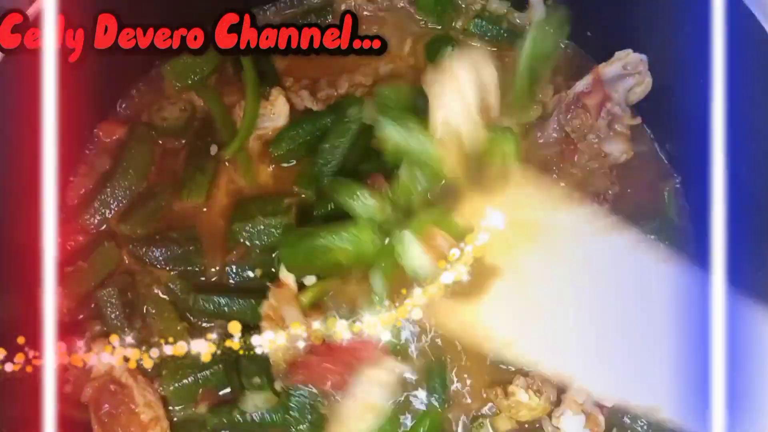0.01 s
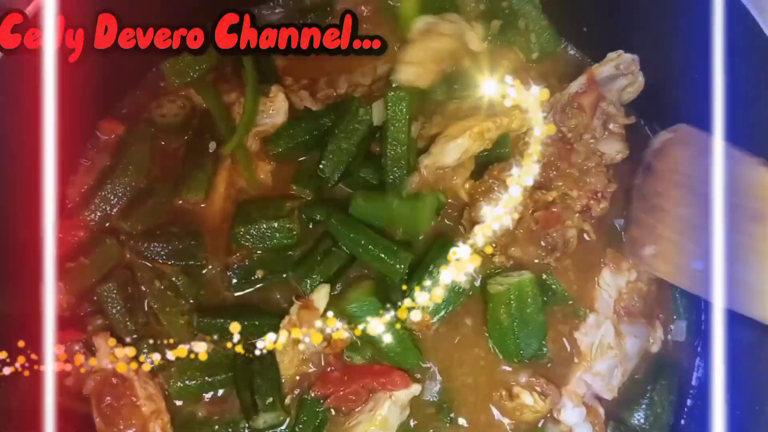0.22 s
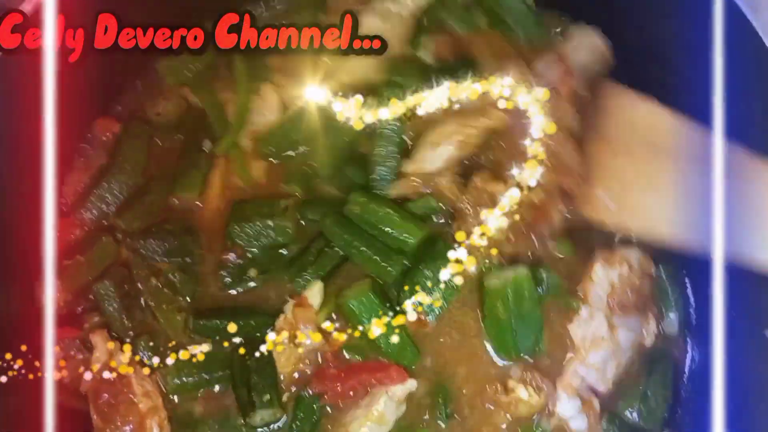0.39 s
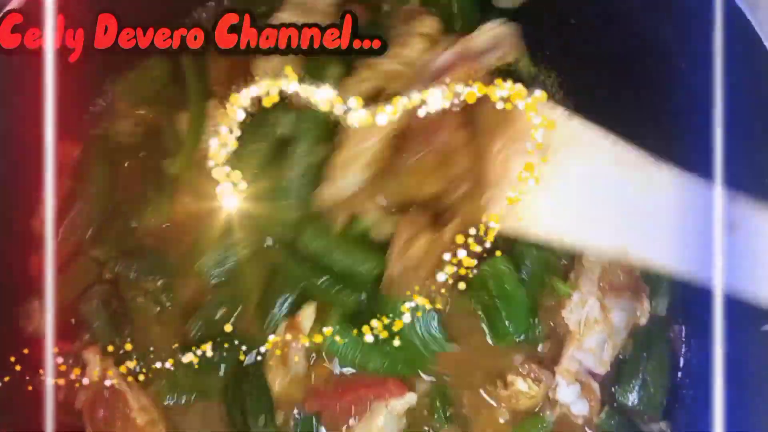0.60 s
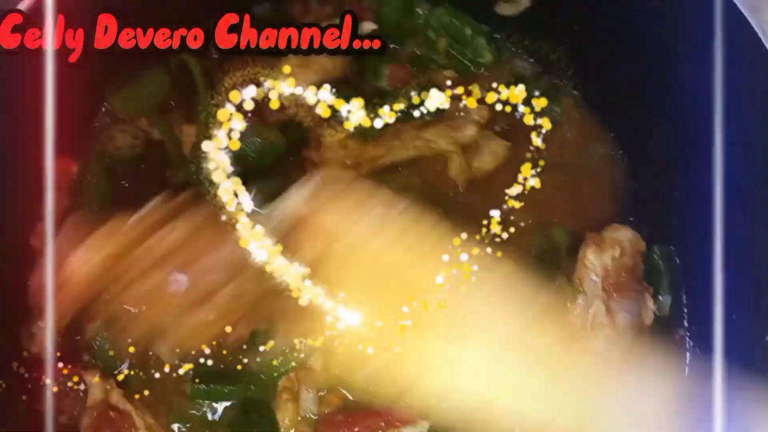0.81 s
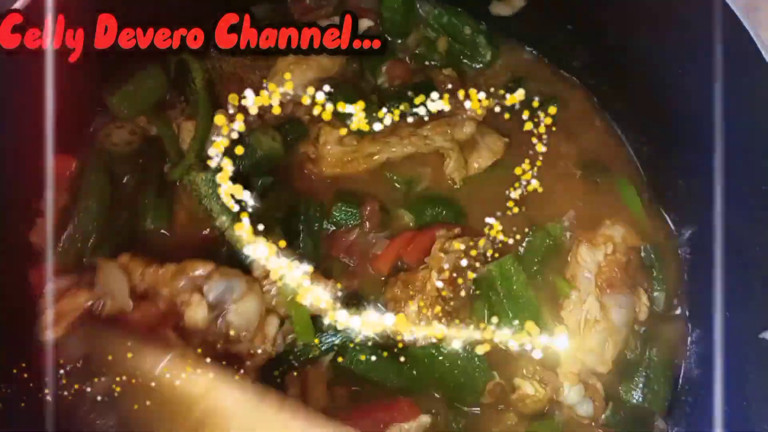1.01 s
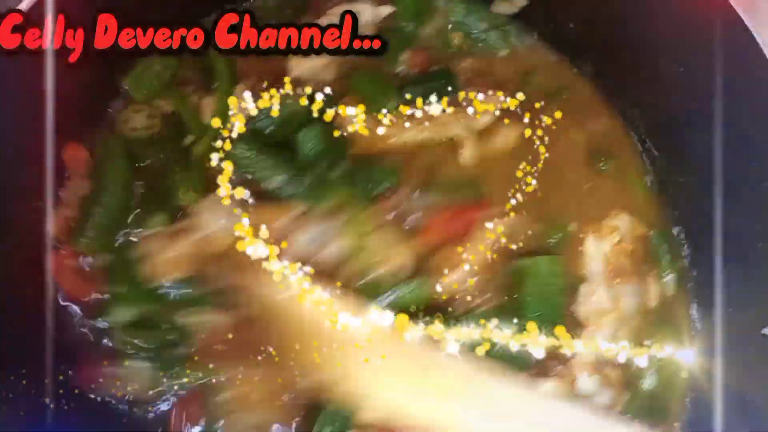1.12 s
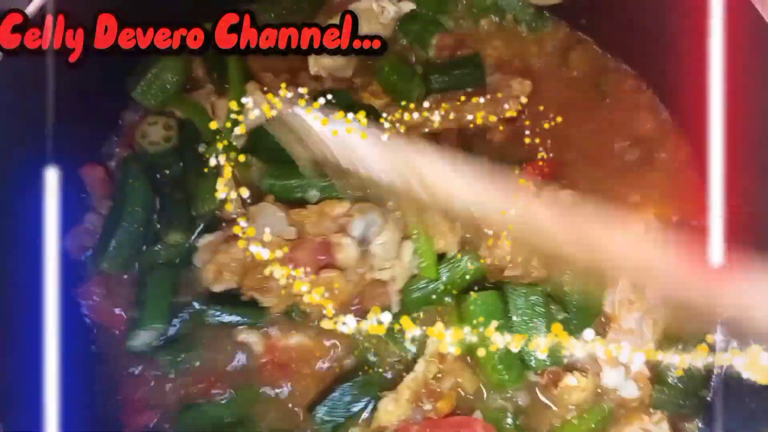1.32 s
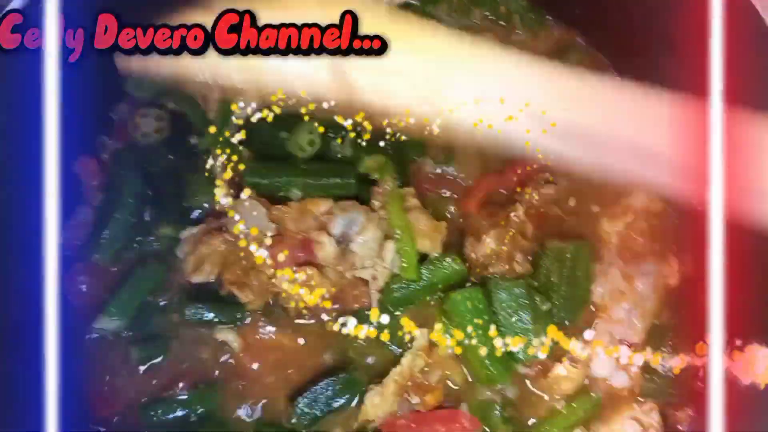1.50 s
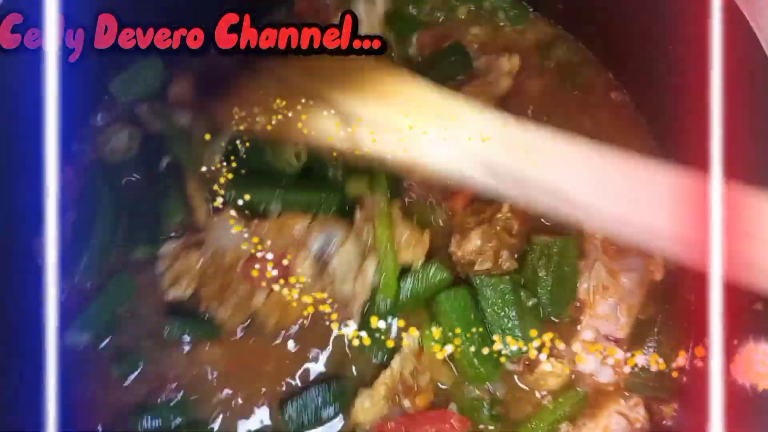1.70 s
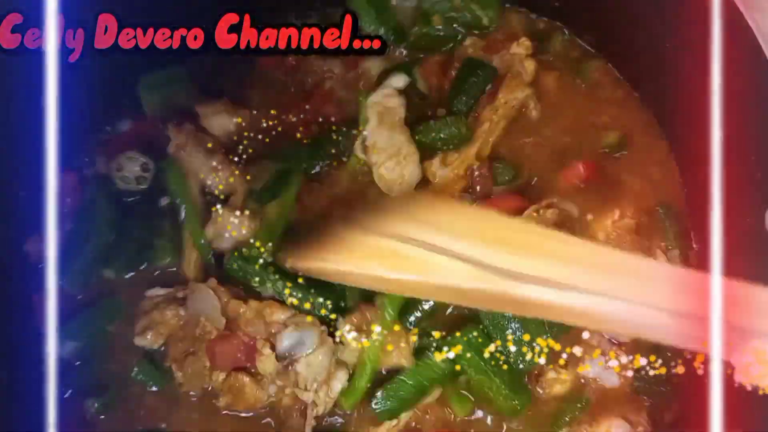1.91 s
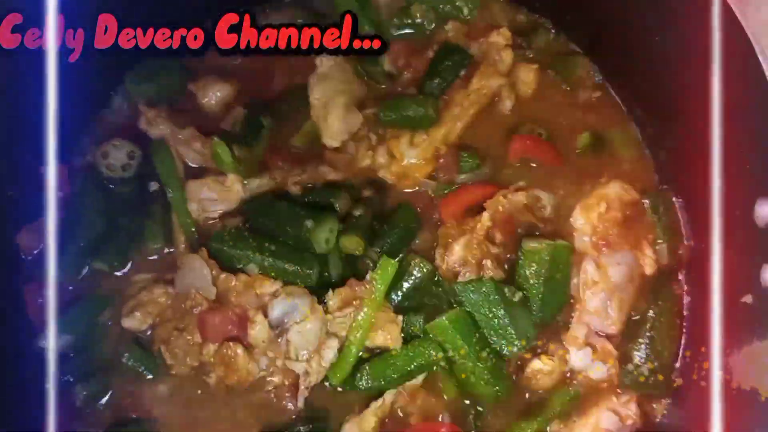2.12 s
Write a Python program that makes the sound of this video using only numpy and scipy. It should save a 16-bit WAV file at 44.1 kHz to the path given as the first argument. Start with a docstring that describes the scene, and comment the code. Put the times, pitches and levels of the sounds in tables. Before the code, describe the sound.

A wooden spatula ticks and knocks hard on a pot wall early on, then lands with a dull wet plop; faint bubbles, squelches and simmering hiss follow, close up in a small kitchen, mono.

```python
"""A small kitchen, at a pot of thick stew: a wooden spatula ticks, then knocks on the pot wall.
It lands once more with a dull, wet plop. Knocks and plop are damped ringing tones; the knocks add noise cracks.
Bubbles are short rising rings and squelches are swells of crackle, over a faint hiss of shaped noise.
A low hum of wavering tone and rumble swells and fades underneath.
The room answers spatula, bubbles and squelches with decaying noise; hiss and hum stay dry."""
import sys
import numpy as np
from scipy import signal
from scipy.fft import rfft, irfft, next_fast_len
from scipy.io import wavfile
from scipy.ndimage import map_coordinates

SR = 44100
rng = np.random.default_rng(int(sys.argv[2]) if len(sys.argv) > 2 else 0)


def materialize(psi):
    """Save the field psi as 16-bit PCM at rate SR to the path in sys.argv[1].

    A 1-D psi becomes a single channel; in a 2-D psi each row is a channel.
    """
    bounded = np.clip(np.atleast_2d(psi).T, -1, 1)
    quanta = np.round(bounded * 32767).astype(np.int16)
    wavfile.write(sys.argv[1], SR, quanta)


N = 97020  # 2.2 s


def amp(db):
    """Decibels to gain."""
    return 10 ** (np.asarray(db) / 20)


def unit(x):
    """Scale to rms 1."""
    return x / np.sqrt(np.mean(x ** 2) + 1e-20)


def along(points, hz):
    """Read (Hz, value) points on a log frequency axis."""
    f, v = np.transpose(points)
    return np.interp(np.log(hz + 1), np.log(f + 1), v)


def curve(rows):
    """Join (s, value) points by straight lines, one value per sample."""
    return np.interp(np.arange(N) / SR, *np.transpose(rows))


def wobble(rate):
    """A smooth random curve with rate knots a second."""
    return map_coordinates(rng.standard_normal(400), [np.arange(N) * rate / SR], mode="wrap")


def filtered(x, response):
    """Shape the spectrum of x by a response of frequency."""
    m = next_fast_len(len(x) + SR // 10)
    spectrum = rfft(x, m) * response(np.fft.rfftfreq(m, 1 / SR))
    return irfft(spectrum, m)[:len(x)]


def low_cut(x, hz):
    """Remove the bass below hz."""
    return signal.sosfilt(signal.butter(2, hz, "high", fs=SR, output="sos"), x)


def noise(response):
    """Noise of rms 1 with the given colour."""
    return unit(filtered(rng.standard_normal(N), response))


def fade(t, t60):
    """Exponential decay, 60 dB in t60 seconds."""
    return np.exp(-np.log(1000) * t / t60)


def ring(modes, t, attack):
    """Damped modes struck together, with a soft onset of attack seconds."""
    tones = sum(amp(db) * fade(t, t60) * np.sin(2 * np.pi * hz * t) for hz, db, t60 in modes)
    return tones * (1 - np.exp(-t / attack))


def add(track, s, sound):
    """Mix a sound into the track at time s."""
    part = track[max(0, round(s * SR)):][:len(sound)]
    part += sound[:len(part)]


# Spatula contacts on the pot wall: t/s, then relative strength level/dB at each FORCE_BANDS frequency
CONTACTS = [(0.2034, -41.5, -6.5, -27.5, 2), (0.2837, 2.5, -17.5, -24, -10), (.2866, -7.5, 4.5, 2.5, -7.5),
            (0.2881, -12, -27, -12, 0), (0.2904, -27, -17, -13, -14)]
# Frequencies at which each contact's strength is given: f/Hz
FORCE_BANDS = [700, 2100, 3800, 6200]
# Modes of the pot wall: f/Hz, relative level/dB, t60/s
POT_MODES = [(322, -46, .15), (393, -30, .042), (497, -41, .17), (736, -23.5, .03), (1079, -33.5, .04),
             (1635, -20.5, .0053), (2005, -26, .027), (2240, -17.5, .014), (2450, -21, .0094),
             (2775, -27, .025), (3055, -36, .028), (4470, -24, .018), (5050, -34, .013),
             (5590, -25.5, .014), (6200, -31, .012)]
# Colour of the dry crack of a contact: f/Hz, relative level/dB
CRACK_COLOUR = [(150, -30), (500, -11), (900, 14.5), (1500, -34.5), (2600, -1.5), (3700, 0), (5000, 11),
                (6500, -11.5), (7700, -4.5), (8800, -31), (10000, -39), (15000, -28)]
KNOCK_DB, KNOCK_ATTACK_S = -0.5, 0.00013
CRACK_DB, CRACK_T60_S = -32, 0.026
POT_LOW_CUT_HZ, WOOD_HIGH_CUT_HZ = 194, 8100


def knocks():
    """Each contact rings the pot wall and cracks; its force spectrum colours both."""
    wall, cracks = np.zeros(N), np.zeros(N)
    t = np.arange(SR // 4) / SR
    for s, *strengths in CONTACTS:
        force = list(zip(FORCE_BANDS, strengths))
        struck = [(hz, db + along(force, hz), t60) for hz, db, t60 in POT_MODES]
        add(wall, s, ring(struck, t, KNOCK_ATTACK_S))
        crack = noise(lambda f: amp(along(CRACK_COLOUR, f)))
        crack = filtered(crack, lambda f: amp(along(force, f)))[:len(t)]
        add(cracks, s, crack * fade(t, CRACK_T60_S))
    return amp(KNOCK_DB) * damped(wall), amp(CRACK_DB) * low_cut(cracks, POT_LOW_CUT_HZ)


def damped(wall):
    """The small pot gives out little deep bass, and wood excites little top treble."""
    high_cut = signal.butter(6, WOOD_HIGH_CUT_HZ, fs=SR, output="sos")
    return signal.sosfilt(high_cut, low_cut(wall, POT_LOW_CUT_HZ))


# What rings as the spatula lands in the stew: f/Hz, relative level/dB, t60/s
PLOP_MODES = [(717, -1.5, 0.021), (857, -5, 0.011), (1004, -15, .011), (1870, -14.5, 0.019),
              (2310, -19.5, 0.026)]
PLOP_S, PLOP_DB, PLOP_ATTACK_S, PLOP_LOW_CUT_HZ = 0.6647, -24.5, 0.00048, 585


def plop():
    """A soft blow cushioned by the stew: damped modes with a slower attack than the knocks."""
    out = np.zeros(N)
    t = np.arange(SR // 10) / SR
    add(out, PLOP_S, amp(PLOP_DB) * ring(PLOP_MODES, t, PLOP_ATTACK_S))
    return low_cut(out, PLOP_LOW_CUT_HZ)


# Wet food shifting and tearing off the spatula:
# t/s at the peak, Gaussian spread/s, peak level/dB, centre f/Hz, Gaussian width/octaves
WET_SWELLS = [(0.219, 0.0026, -52, 6300, .5), (0.691, 0.035, -67, 4570, 0.38),
              (1.009, 0.011, -65, 4240, .4), (1.222, 0.0048, -58.5, 3400, 0.3),
              (1.34, 0.0094, -66.5, 3380, 0.87), (1.641, .02, -67.5, 346, 0.17),
              (1.7476, 0.0019, -50, 4800, 0.22), (1.751, 0.0092, -55, 1390, 1.9),
              (1.937, 0.021, -68, 418, 0.53), (2.125, 0.0046, -59.5, 5050, 0.51),
              (0.539, 0.01, -69.5, 5630, .4), (0.53, 0.019, -67.5, 210, 0.23),
              (.935, .015, -77.5, 6950, 0.27)]
GRAINS_PER_S, SMOOTH_NOISE = 600, 0.3  # smooth noise is relative to the grains' rms


def squelches():
    """Short swells of wet crackle: many tiny films of sauce breaking."""
    out, t = np.zeros(N), np.arange(N) / SR
    for s, spread, db, hz, octaves in WET_SWELLS:
        breaks = rng.random(N) < GRAINS_PER_S / SR
        grains = unit(rng.choice([-1, 1], N) * breaks)
        crackle = grains + SMOOTH_NOISE * rng.standard_normal(N)

        def band(f):
            return np.exp(-.5 * (np.log2((f + 1) / hz) / octaves) ** 2) / (1 + (f / 7800) ** 20)

        swell = np.exp(-.5 * ((t - s) / spread) ** 2)
        out += amp(db) * swell * unit(filtered(crackle, band))
    return out


POP_RISE = 0.04  # fraction of the pitch gained over one t60


def bubble(hz, t60):
    """A short ring whose pitch rises as it dies."""
    t = np.arange(SR // 20) / SR
    cycles = hz * t * (1 + POP_RISE * np.minimum(t / t60, 1) / 2)
    return fade(t, t60) * np.sin(2 * np.pi * cycles) * (1 - np.exp(-t * hz))


# Single bubbles bursting: t/s, starting f/Hz, level/dB, t60/s
BUBBLE_POPS = [(0.164, 2820, -41.5, .012), (0.181, 3500, -41, 0.0081), (0.773, 7600, -59, 0.0063),
               (0.8802, 1740, -47.5, .018), (.9042, 1600, -44.5, .011), (1.004, 5200, -39.5, 0.0055),
               (1.06, 6000, -54.5, 0.0075), (1.171, 2640, -51.5, 0.013), (1.2185, 3550, -47.5, 0.0056),
               (2.0634, 3050, -54.5, 0.015), (2.1934, 3800, -57, 0.0091)]
POP_SNAP_DB = -8  # relative to the bubble


def pops():
    """A few clear bubbles, each a rising ring with a snap of noise."""
    out = np.zeros(N)
    for s, hz, db, t60 in BUBBLE_POPS:
        tone = bubble(hz, t60)
        snap = noise(lambda f: 1 / (1 + (f / hz) ** 4) * f / (f + hz) / (1 + (f / 8000) ** 20))
        snap = snap[:len(tone)] * fade(np.arange(len(tone)) / SR, t60)
        add(out, s, amp(db) * (tone + amp(POP_SNAP_DB) * snap))
    return out


FIZZ_PER_S, FIZZ_HZ, FIZZ_SPREAD = 200, 4970, 0.45  # spread: either way in log pitch
FIZZ_CYCLES, FIZZ_DB, FIZZ_RANGE_DB = 18, -56, 18  # cycles per t60, loudest level, range below it


def fizz():
    """Tiny bubbles bursting at random, most of them faint."""
    out = np.zeros(N)
    for when, pitch, size in rng.random((int(FIZZ_PER_S * N / SR), 3)):
        hz = FIZZ_HZ * np.exp(FIZZ_SPREAD * (2 * pitch - 1))
        db = FIZZ_DB - FIZZ_RANGE_DB * np.sqrt(size)
        add(out, when * N / SR, amp(db) * bubble(hz, FIZZ_CYCLES / hz))
    return out


# Colour of the simmering hiss: f/Hz, relative level/dB per Hz
HISS_COLOUR = [(30, -12), (60, -2.5), (90, 10), (200, 2.5), (380, 1.5), (650, -1), (1000, -3), (1350, -7.5),
               (1800, 2), (2300, 0), (2550, -4), (3300, -12.5), (4500, -9.5), (5500, -8), (6150, -10),
               (6700, -22.5), (7700, -22), (8600, -27), (15000, -18)]
# Slow drift of the hiss: t/s, level/dB
HISS_LEVEL = [(0, -63.5), (.45, -63), (.6, -61.5), (.8, -65), (.97, -62.5), (1.1, -65.5), (1.35, -63),
              (1.55, -65.5), (1.85, -65), (2.03, -63), (2.2, -65)]
# Faint narrow tones in the hiss: f/Hz, half width/Hz, level/dB
NARROW_TONES = [(526.3, 12, -77.5), (821, 3.8, -78.5), (2080, 26, -76), (2321, 17, -75.5)]


def simmer():
    """The gently drifting hiss of the stew: coloured noise with faint narrow bands in it."""
    level = curve(HISS_LEVEL) + 0.2 * wobble(30.52)  # dB
    hiss = amp(level) * noise(lambda f: amp(along(HISS_COLOUR, f)))
    tones = sum(amp(db) * noise(lambda f: 1 / (1 + ((f - hz) / width) ** 2))
                for hz, width, db in NARROW_TONES)
    return hiss + tones


# Swell of the low hum: t/s, level/dB of its tone
HUM_LEVEL = [(0.0, -68), (0.12, -76), (0.15, -75.5), (0.26, -61.5), (0.34, -72), (0.39, -53.5), (0.47, -59),
             (0.5, -67.5), (0.69, -63.5), (0.72, -82), (0.77, -57.5), (0.8, -85), (0.94, -55),
             (1.14, -81.5), (1.17, -64), (1.22, -71.5), (1.26, -58.5), (1.31, -91), (1.36, -58.5),
             (1.39, -82), (1.46, -63), (1.52, -65), (1.54, -91), (1.57, -73), (1.72, -63.5), (1.8, -85),
             (1.84, -59.5), (1.9, -85), (2.02, -55), (2.06, -76.5), (2.1, -62), (2.2, -89)]
HUM_HZ, HUM_WANDER_HZ, RUMBLE_DB = 121.2, 5.47, -7.5  # rumble is relative to the tone


def hum():
    """A low tone wavering in pitch, with rumble round it; both swell together."""
    pitch = HUM_HZ + HUM_WANDER_HZ * wobble(16)
    tone = np.sqrt(2) * np.sin(2 * np.pi * np.cumsum(pitch) / SR)
    colour = [(30, -22), (60, -13.5), (120, -8.5), (200, -6), (400, -65), (1000, -120)]  # f/Hz, dB
    rumble = noise(lambda f: amp(along(colour, f)))
    return amp(curve(HUM_LEVEL)) * (tone + amp(RUMBLE_DB) * rumble)


# Decay of the kitchen's tail: f/Hz, t60/s
TAIL_T60 = [(150, 0.9), (500, 0.11), (2300, 0.56), (5000, 0.26), (9000, 0.82)]
# Colour of the tail: f/Hz, level/dB
TAIL_COLOUR = [(150, -14), (400, -11), (800, -14), (2000, -17), (2500, -14.5), (3700, -15), (4450, -16),
               (5100, -10), (5700, -14), (9000, -14)]
EARLY_DB, EARLY_T60_S, ONSET_S = -13, 0.13, 0.0071


def kitchen(x):
    """Dense echoes off the pot and stove, overlapping the room's tail: both are decaying noise."""
    _, t, bands = signal.stft(rng.standard_normal(SR // 2), SR, nperseg=256)
    decay = fade(t, along(TAIL_T60, _)[:, None])
    tail = signal.istft(bands * decay, SR, nperseg=256)[1]
    t = np.arange(len(tail)) / SR
    onset = 1 - np.exp(-(t / ONSET_S) ** 2)
    tail = filtered(tail / np.linalg.norm(tail), lambda f: amp(along(TAIL_COLOUR, f))) * onset
    early = rng.standard_normal(len(t)) * fade(t, EARLY_T60_S) * onset
    early = amp(EARLY_DB) * early / np.linalg.norm(early)
    return signal.fftconvolve(x, tail + early)[:N]


# Level sent into the room, dB relative to the direct sound
KNOCK_ROOM_DB, CRACK_ROOM_DB, PLOP_ROOM_DB, STEW_ROOM_DB = -1, 6, -0.5, 3.5


def scene():
    """Spatula and stew in the kitchen; the pot's open top throws the crack out into the room."""
    wall, cracks = knocks()
    landing = plop()
    stew = squelches() + pops() + fizz()
    sent = amp(KNOCK_ROOM_DB) * wall + amp(CRACK_ROOM_DB) * cracks
    sent += amp(PLOP_ROOM_DB) * landing + amp(STEW_ROOM_DB) * stew
    direct = wall + cracks + landing + stew
    return (direct + kitchen(sent) + simmer() + hum())[None]  # one channel


TOP_HZ = 15750  # band limit


def record(dry):
    """The recorder behind the microphone dulls the top treble and keeps nothing above its band limit."""
    colour = [(7800, -1.5), (9200, -8.5), (15000, -20)]  # f/Hz, level/dB
    return np.array([filtered(x, lambda f: amp(along(colour, f)) * (f < TOP_HZ)) for x in dry])


dry = scene()
out = record(dry)
materialize(out)
```